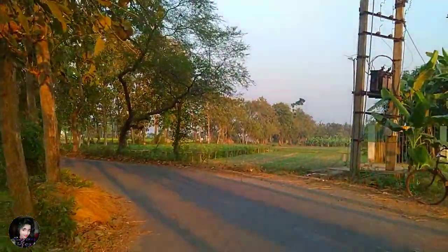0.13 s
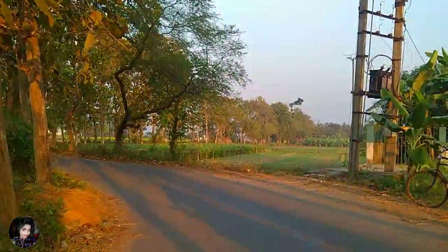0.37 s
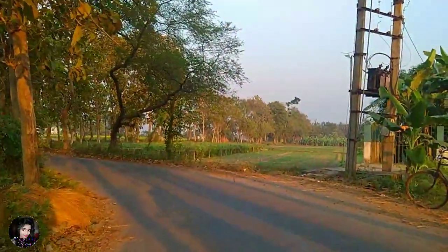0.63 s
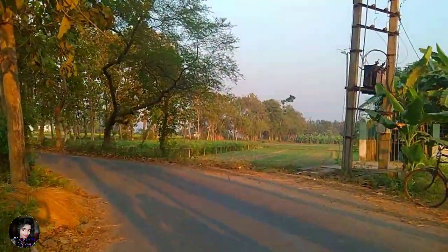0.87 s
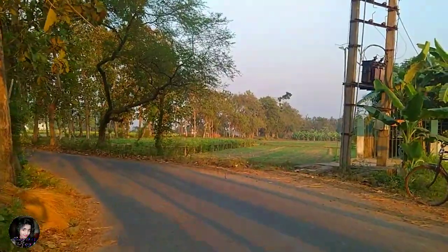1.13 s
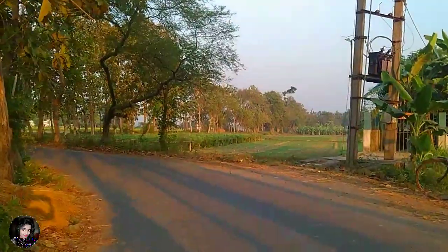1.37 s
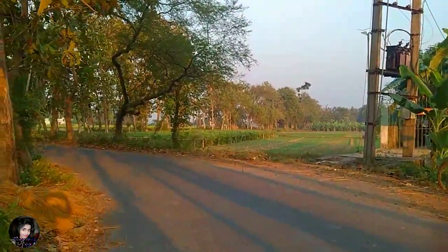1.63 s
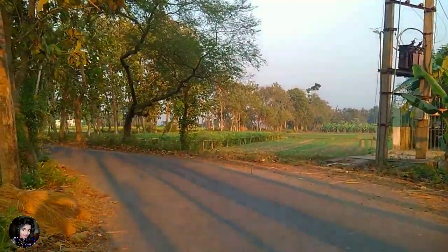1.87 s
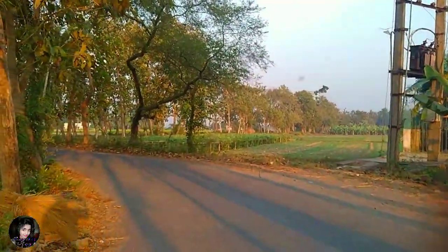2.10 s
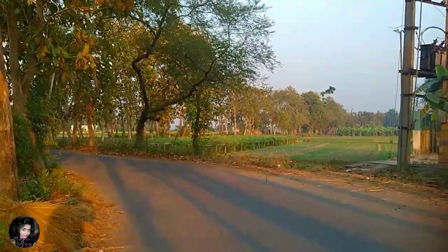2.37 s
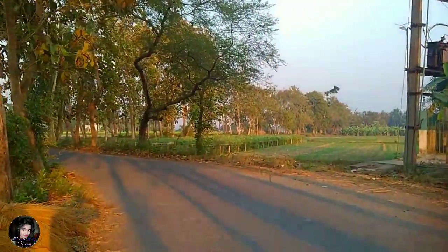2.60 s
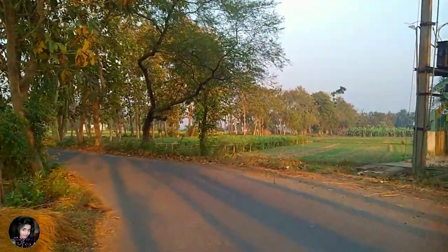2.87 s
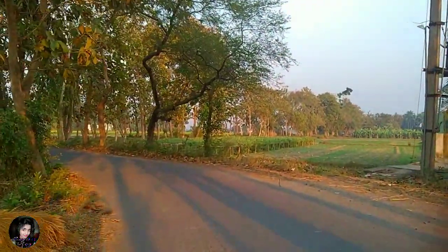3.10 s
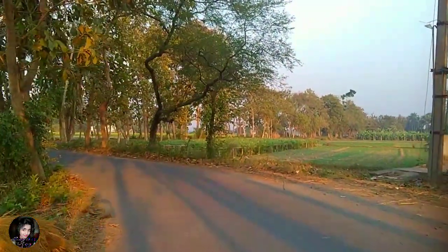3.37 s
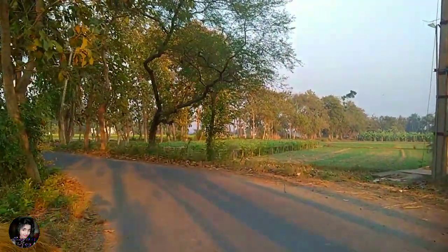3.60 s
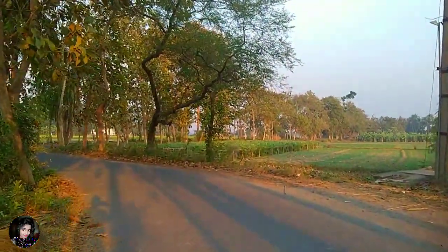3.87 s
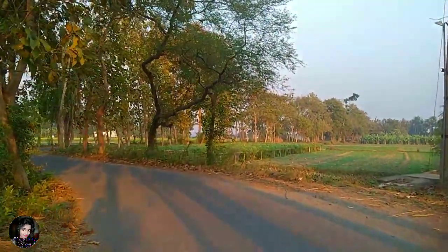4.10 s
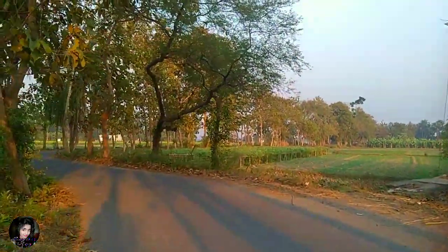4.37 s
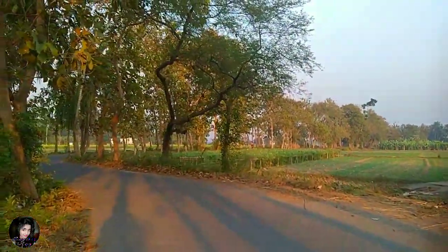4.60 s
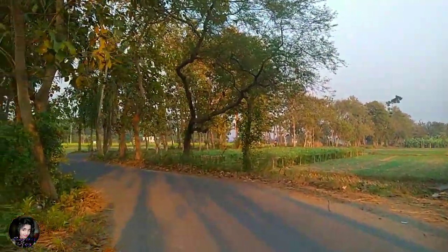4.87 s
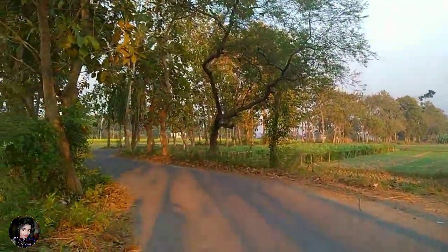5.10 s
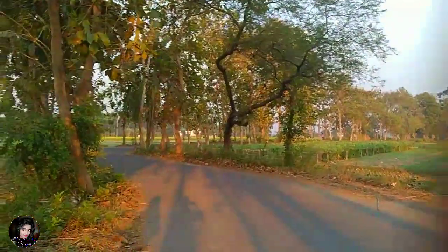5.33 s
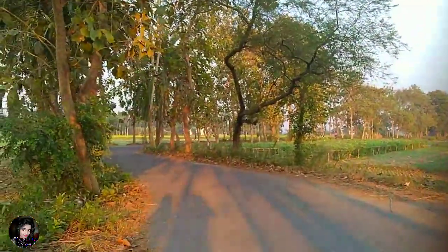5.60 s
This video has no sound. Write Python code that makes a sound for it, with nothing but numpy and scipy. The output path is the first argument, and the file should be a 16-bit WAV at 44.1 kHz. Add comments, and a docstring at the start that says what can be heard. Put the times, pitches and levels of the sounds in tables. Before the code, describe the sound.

On a tree-lined rural road, a small engine beats fast and deep, each thump hollow and slightly echoed, with gassy roar and metallic rattle pulsing along. A quick swish opens the scene, then crisp clicks and knocks scatter close to the phone. From about two seconds the engine draws away, leaving faint thuds, soft air, barely audible far chirrs, and one hard little clack near the end.

```python
"""Single-cylinder engine on a country road

A single-cylinder engine chugs away, heard through a phone: each firing rings the silencer, returns inverted
from the pipe end and comes back from trees; gas roars and parts rattle in time with it, and small parts of the
engine knock (damped resonances). Near the start a swish of shaped noise goes by; clicks (noise bursts) come
from the engine and, after about 3.4 s, from nearby, where a bouncing clack (damped resonances) also sounds, and
faint chirrs (narrow noise) sound far off, over the hush of open fields."""
import sys
import numpy as np
from scipy import signal
from scipy.fft import rfft, irfft
from scipy.io import wavfile
from scipy.ndimage import uniform_filter1d

SR = 44100
rng = np.random.default_rng(int(sys.argv[2]) if len(sys.argv) > 2 else 0)


def decibels_to_gain(level_db):
    """Convert a level in decibels to a linear amplitude gain (20 dB per decade)."""
    exponent = np.asarray(level_db, float) / 20
    return 10 ** exponent


def store_wav(level_fs):
    """Save 16-bit WAV to argv[1]."""
    pcm = np.round(np.clip(np.atleast_2d(level_fs), -1, 1) * 32767)
    wavfile.write(sys.argv[1], SR, pcm.T.astype(np.int16))


N = 252252
T = np.arange(N) / SR

# firings of the engine, levels relative to one another: start_s, level_db
FIRINGS = [(0.0475, -21.2), (0.1578, -17.6), (0.253, -14.5), (0.3463, -17.2), (0.4553, -18.7),
           (0.5603, -17.0), (0.6598, -13.1), (0.7645, -16.3), (0.8717, -13.4), (0.9769, -14.3),
           (1.0875, -15.7), (1.1932, -16.0), (1.3028, -13.0), (1.4089, -15.0), (1.5193, -15.0),
           (1.6244, -14.4), (1.7314, -17.7), (1.8384, -19.3), (1.9467, -20.7), (2.0502, -21.9),
           (2.1559, -23.2), (2.261, -23.2), (2.3639, -23.7), (2.4676, -25.2), (2.5686, -25.1),
           (2.6734, -26.6), (2.7758, -26.4), (2.8834, -28.0), (2.9905, -28.5), (3.0968, -27.9),
           (3.2009, -28.5), (3.3053, -31.3), (3.4125, -30.8), (3.5198, -26.5), (3.6201, -27.1),
           (3.7209, -29.3), (3.8268, -28.6), (3.9257, -29.1), (4.0287, -28.2), (4.129, -28.2),
           (4.2322, -29.2), (4.336, -30.0), (4.4385, -29.8), (4.5393, -31.2), (4.6433, -28.5),
           (4.7436, -28.6), (4.8424, -30.1), (4.9438, -31.1), (5.047, -31.2), (5.1425, -31.5),
           (5.2444, -32.4), (5.3507, -32.3), (5.4478, -31.9), (5.5435, -32.4), (5.6465, -34.8)]
# engine noise as it fades, before the swell of each stroke: time_s, roar_db, rattle_db
ENGINE_NOISE = [(0, -43, -56.5), (.3, -37.5, -53.5), (.5, -41, -55), (.75, -37, -56), (1.2, -38, -56.5),
                (1.6, -43.5, -54.5), (2.4, -49.5, -65), (2.9, -55, -68.5), (3.7, -53, -66),
                (4.7, -54.5, -65), (5.2, -53.5, -65), (5.72, -57.5, -69.5)]
PUFF_MS = 2.6  # length of one puff of exhaust gas


def ring(x, hz, width_hz):
    """Resonance: a damped two-pole oscillator with gain 1 at its centre."""
    r = np.exp(-np.pi * width_hz / SR)
    return signal.lfilter([1 - r, 0, r - 1], [1, -2 * r * np.cos(2 * np.pi * hz / SR), r * r], x)


def colour(x, table):
    """Spectral shaping: causal minimum-phase filter of an (hz, gain_db) table, by folding the cepstrum."""
    hz, db = np.transpose(table)
    grid = np.maximum(np.fft.rfftfreq(4096, 1 / SR), 1)
    log_gain = np.log(decibels_to_gain(np.interp(np.log(grid), np.log(hz), db)))
    cepstrum = irfft(log_gain)
    cepstrum[1:2048] *= 2
    cepstrum[2049:] = 0
    response = irfft(np.exp(rfft(cepstrum)))
    return signal.fftconvolve(x, response)[:len(x)]


def unit(x):
    """Normalisation of signal power: scaled to rms 1."""
    return x / np.sqrt(np.mean(x ** 2))


def noise():
    """White noise: independent normal samples, equal power at all frequencies."""
    return rng.standard_normal(N)


def walk(rate):
    """Random modulation: levels held 1 / rate s, smoothed twice by a moving mean; rms 1."""
    k = int(SR / rate)
    steps = np.repeat(rng.standard_normal(N // k + 1), k)
    smooth = uniform_filter1d(uniform_filter1d(steps, k), k)
    return unit(smooth[:N])


def curve(table, column, at=T):
    """Linear interpolation of one table column over time."""
    rows = np.array(table)
    return np.interp(at, rows[:, 0], rows[:, column])


def add(out, s, sound):
    """Superposition: mixes a sound in at time s."""
    i = int(s * SR)
    out[i:i + len(sound)] += sound[:N - i]


def gas_puff():
    """Pressure pulse: one smooth rise and fall of exhaust gas."""
    return np.hanning(int(PUFF_MS * SR / 1000) + 1)


def exhaust():
    """Reflection and resonance: a puff and its inverted returns drive the pipe, two chambers and tree echoes."""
    # the ring drifts along the road: time_s, first_return_share, second_return_share, small_chamber_hz
    ring_drift = [(0, 1.06, .45, 155), (.6, .95, .34, 147), (1.7, .8, .19, 145), (2.4, .78, .17, 151),
                  (2.9, .87, .36, 148), (3.35, .96, .4, 140), (4.05, .82, .05, 150), (4.4, .85, .14, 151),
                  (4.65, .84, .34, 144), (5.1, .9, .21, 147), (5.72, .95, .38, 144)]
    # large and small silencer chamber: width_hz, signed_gain
    chambers = [(7.8, 11.08), (30, -7.3)]
    large_hz, pipe_hz, pipe_width_hz = 99.8, 64.2, 101.6
    early_ms, early_share, second_lag_ms = 13.6, .11, 6.2
    return_ms, return_scatter_ms, share_scatter, chamber_scatter_hz = 20.35, .15, .04, 1.5
    # echo from the roadside trunks, and the band they send back best
    trees_ms, trees_scatter_ms, trees_db, trees_scatter_db = 42, 5, -17, 3
    trees_hz, trees_width_hz = 150, 90
    out, puff = np.zeros(N), gas_puff()
    for (s, db), chance in zip(FIRINGS, rng.standard_normal((len(FIRINGS), 6))):
        back_ms = return_ms + return_scatter_ms * chance[0]
        first = curve(ring_drift, 1, at=s) + share_scatter * chance[1]
        second = curve(ring_drift, 2, at=s) + share_scatter * chance[2]
        small_hz = curve(ring_drift, 3, at=s) + chamber_scatter_hz * chance[5]
        late_s = (trees_ms + trees_scatter_ms * chance[3]) / 1000
        echo_gain = decibels_to_gain(trees_db + trees_scatter_db * chance[4])
        pulses = [(0, 1), (early_ms, -early_share), (back_ms, -first), (back_ms + second_lag_ms, -second)]
        drive = np.zeros(SR // 4)
        for ms, share in pulses:
            add(drive, ms / 1000, share * decibels_to_gain(db) * puff)
        pipe = ring(drive, pipe_hz, pipe_width_hz)
        for hz, (width_hz, gain) in zip((large_hz, small_hz), chambers):
            thump = gain * ring(pipe, hz, width_hz)
            add(out, s, thump)
            add(out, s + late_s, echo_gain * ring(thump, trees_hz, trees_width_hz))
    return out


def bark():
    """Impulse excitation: each puff briefly rings the tail pipe, a doubled resonance."""
    hz, width_hz, lag_ms = 250, 170, 1.7
    peak_db = -20.5  # relative to the level of the firing
    puff = np.pad(gas_puff(), (0, 1500))
    pipe = -ring(ring(puff, hz, width_hz), hz, width_hz)
    pipe = pipe / abs(pipe).max()
    out = np.zeros(N)
    for s, db in FIRINGS:
        add(out, s + lag_ms / 1000, decibels_to_gain(db + peak_db) * pipe)
    return out


def stroke(depth, lead_s, open_s):
    """Amplitude modulation: gain swells while the exhaust valve is open, more on near and hard firings."""
    # all three are scaled by depth
    swell_db = 5  # at the loudest firing
    swell_fade = .1  # dB lost per dB of fading
    swell_force = .6  # dB per dB over the neighbouring firings
    times, db = np.transpose(FIRINGS)
    usual_db = uniform_filter1d(db, size=5)
    swells_db = swell_db - swell_fade * (db.max() - usual_db) + swell_force * (db - usual_db)
    u = np.linspace(0, 1, int(open_s * SR))
    shape = np.minimum(u / 0.085, 1) * np.sqrt(1 - u ** 2)
    gain_db = np.zeros(N)
    for s, height_db in zip(times, np.maximum(swells_db, 0)):
        add(gain_db, s - lead_s, depth * height_db * shape)
    return decibels_to_gain(gain_db)


def roar():
    """Turbulence and modal response: gas rushes through the pipe; uneven jolts ring each casing panel."""
    # spectrum of the gas noise: hz, relative_db
    gas_colour = [(120, -23), (230, -2), (320, -5), (600, -8), (1100, -7), (1500, -10.5), (3200, -18.5),
                  (4200, -31), (5500, -54.5)]
    # casing panels, levels relative to the gas: hz, width_hz, level_db
    panels = [(230.6, 52, -11), (291.4, 14.5, -12.5), (420, 25, -12.5), (595, 26, -13.5), (700, 65, -13),
              (764, 29, -8.5), (822, 37, -15), (947, 27, -24), (1232, 31, -13.5), (1315, 30, -10),
              (1591, 28, -17.5), (1747, 81, -16), (2065, 48, -18.5), (2375, 270, -18)]
    gas = unit(colour(noise(), gas_colour)) * decibels_to_gain(1.65 * walk(60))
    for hz, width_hz, db in panels:
        hits = rng.random(N) < 120 / SR  # about 120 per second
        jolts = hits * noise() * decibels_to_gain(3.53 * walk(22.01))
        gas = gas + unit(ring(jolts, hz, width_hz)) * decibels_to_gain(db)
    return unit(gas) * stroke(depth=0.81, lead_s=.012, open_s=0.062) * decibels_to_gain(curve(ENGINE_NOISE, 1))


def rattle():
    """Random impacts: dense tiny knocks of uneven size in loose parts, shaken hardest on the exhaust stroke."""
    # spectrum of the rattle: hz, relative_db
    rattle_colour = [(3000, -53), (4500, 5.5), (8000, -7), (12000, 5.5), (16000, -0.5)]
    gate = stroke(depth=1.0, lead_s=0.0083, open_s=0.076)
    hits = rng.random(N) < 250 / SR  # about 250 per second
    impacts = hits * decibels_to_gain(np.minimum(3.0 * rng.exponential(1, N), 11))
    # each impact's power decays exponentially
    smear = np.sqrt(signal.lfilter([1], [1, -np.exp(-1 / (0.0063 * SR))], impacts ** 2))
    hiss = unit(colour(noise(), rattle_colour))
    return unit(hiss * (1 + 0.9 * smear)) * gate * decibels_to_gain(curve(ENGINE_NOISE, 2))


def envelope(start_s, attack_s, hold_s, release_s, db):
    """Amplitude envelope: straight rise, hold and fall."""
    corners_s = start_s + np.cumsum([0, attack_s, hold_s, release_s])
    return decibels_to_gain(db) * np.interp(T, corners_s, [0, 1, 1, 0])


def swish():
    """Enveloped broadband noise: a brush of hiss swells over two scrapes of lower-pitched noise."""
    # spectra of hiss and scrape: hz, relative_db
    hiss_colour = [(2000, -34), (3500, -5.5), (4300, -12), (5300, 3), (7000, -13), (9000, -14.5),
                   (12000, -5), (16000, -6.5)]
    scrape_colour = [(120, -40), (250, 4), (420, -2.5), (800, -8), (1500, -5), (3500, -18), (6000, -34)]
    # envelopes of hiss and scrapes: start_s, attack_s, hold_s, release_s, level_db
    hiss_shape = (.045, .13, .105, .035, -30)
    scrape_shapes = [(.04, .21, .01, .025, -36), (.288, .012, .01, .025, -32.5)]
    hiss = unit(colour(noise(), hiss_colour)) * decibels_to_gain(2.2 * walk(74.2))
    scrape = unit(colour(noise(), scrape_colour)) * decibels_to_gain(2.8 * walk(118.8))
    return hiss * envelope(*hiss_shape) + scrape * sum(envelope(*row) for row in scrape_shapes)


def clicks():
    """Transient noise bursts: quick-starting sprays of treble, the topmost air with its own strength."""
    # sharp clicks, relative levels, air relative to the click: start_s, level_db, air_db
    sharp_clicks = [(0.3551, -32, -10), (0.4526, -31, -9), (0.5866, -32.5, -12), (0.6535, -28, -9),
                    (0.6644, -31, -10), (0.7492, -31, -12), (0.7697, -33, -11), (0.801, -28, -11),
                    (0.81, -32, -12), (0.8715, -28, -17), (0.9867, -32, -18), (1.084, -29.5, -12),
                    (1.1294, -35, -11), (1.1942, -31, -12), (1.2463, -32, -16), (1.2995, -25.5, -7.5),
                    (1.3212, -25, -17), (1.3774, -29, -11), (1.395, -28.5, -16), (1.4377, -28, -11),
                    (1.5184, -34, -10), (1.6324, -30, -20), (1.8233, -37, -12), (1.9325, -42, -15),
                    (2.788, -39, -14), (3.4421, -39, -21), (3.4645, -38, -18), (3.49, -41, -23),
                    (3.5034, -40, -19), (3.5548, -36, -21), (3.8432, -42.5, -19), (4.0243, -40, -15),
                    (4.0468, -39.5, -16), (4.0901, -41, -19), (4.635, -29, -20), (4.6553, -32, -18),
                    (4.6643, -33, -18), (5.212, -27, -23), (5.221, -27.5, -26), (5.2882, -38, -17),
                    (5.4994, -48, -4), (5.6321, -42, -20)]
    # spectra of the click and its topmost air: hz, relative_db
    body_colour = [(1500, -35), (3000, 3), (4500, -1), (7000, 1.5), (9500, -1.5), (12000, -5)]
    air_colour = [(8000, -14), (11000, -5), (16000, -3.5)]
    base_ms, ms_per_db, knee_db = 12.5, 2.37, -27  # clicks above the knee last longer
    # lesser clicks fall at random and follow the level of the rattle
    stray_per_s, over_rattle_db, scatter_db, stray_air_db = 19, 11.5, 6, -17
    stray_at = np.flatnonzero(rng.random(N) < stray_per_s / SR)
    stray_db = curve(ENGINE_NOISE, 2) + over_rattle_db + scatter_db * noise()
    strays = [(T[i], stray_db[i], stray_air_db) for i in stray_at]
    body, air, ms = np.zeros(N), np.zeros(N), T[:2000] * 1000
    for s, db, air_db in sharp_clicks + strays:
        length_ms = base_ms + ms_per_db * max(db - knee_db, 0)
        shape = np.minimum(ms / 0.81, 1) * np.exp(-3.1 * ms / length_ms)
        add(body, s, decibels_to_gain(db) * shape)
        add(air, s, decibels_to_gain(db + air_db) * shape)
    grit = decibels_to_gain(1.6 * walk(760))
    body = body * unit(colour(noise(), body_colour))
    air = air * unit(colour(noise(), air_colour))
    return grit * (0.17 * body + 1.56 * air)


def struck(hz, width_hz):
    """Impact excitation: a tiny gritty blow rings a damped resonance and a broader one in series; peak 1."""
    t = T[:2000]
    blow = (t == 0) + 0.18 * rng.standard_normal(len(t)) * np.exp(-t / 0.002)
    body = ring(ring(blow, hz, width_hz), hz, 3.7 * width_hz)
    return body / abs(body).max()


def knocks():
    """Free vibration after impact: small parts of the engine knock, each with its own ring."""
    # small knocks: start_s, peak_db, ring_hz, width_hz
    small_knocks = [(.271, -36, 1400, 800), (0.299, -34, 1300, 300), (0.313, -22, 420, 149),
                    (.4356, -31, 2100, 400), (0.699, -30, 2500, 1500), (.987, -30, 2200, 1200),
                    (1.137, -38, 3000, 400), (1.215, -23.5, 2420, 400), (1.632, -33, 3000, 1500),
                    (1.711, -31, 1910, 500), (1.9307, -31.5, 2070, 300), (3.3674, -50, 2460, 500),
                    (3.4894, -39, 2320, 350), (3.4928, -29.5, 2450, 800), (3.504, -29, 2270, 700),
                    (4.1024, -36, 2620, 500), (4.114, -41.5, 2900, 600), (4.131, -38, 1200, 600),
                    (4.6345, -36, 626, 200), (4.7294, -40.5, 2650, 500), (5.1952, -39, 600, 400)]
    out = np.zeros(N)
    for s, db, hz, width_hz in small_knocks:
        add(out, s, decibels_to_gain(db) * struck(hz, width_hz))
    return out


def clack():
    """Modal superposition: one harder blow close by rings several modes and bounces twice, losing energy."""
    # modes of the struck thing, relative levels: hz, width_hz, level_db
    modes = [(426, 82, -10.5), (850, 410, 1), (1500, 360, -5), (3170, 210, -6)]
    start_s, level_db, bounce_ms, bounce_loss_db = 5.2124, -26.5, 4.9, 8
    out = np.zeros(N)
    for bounce in range(3):
        s = start_s + bounce * bounce_ms / 1000
        for hz, width_hz, db in modes:
            add(out, s, decibels_to_gain(level_db + db - bounce * bounce_loss_db) * struck(hz, width_hz))
    return out


def chirrs():
    """Narrow-band noise: brief faint rasps from far off, each filtered twice by one resonance."""
    # far chirrs: start_s, length_s, hz, width_hz, level_db
    far_chirrs = [(3.66, .14, 4650, 450, -68), (4.7, .13, 6500, 600, -73), (4.76, .1, 4800, 450, -71)]
    out = np.zeros(N)
    for s, length_s, hz, width_hz, db in far_chirrs:
        hiss = rng.standard_normal(int(length_s * SR))
        rasp = unit(ring(ring(hiss, hz, width_hz), hz, width_hz))
        add(out, s, decibels_to_gain(db) * rasp * np.hanning(len(hiss)) ** 0.13)
    return out


def fields():
    """Stationary ambient noise: far leaves and air, slowly wavering, with a few faint wavering bands."""
    # spectrum of the hush: hz, relative_db
    hush_colour = [(30, -46), (45, -21), (70, -3.5), (150, 7.5), (300, -4.5), (800, -10), (1800, -17),
                   (3000, -19), (6000, -28.5), (16000, -27.5)]
    # faint bands in the hush: hz, width_hz, level_db
    bands = [(485, 40, -67), (755, 50, -65), (950, 40, -69)]
    level_db = -53.5
    hush = unit(colour(noise(), hush_colour)) * decibels_to_gain(level_db + 1.6 * walk(4.76))
    for hz, width_hz, db in bands:
        hush = hush + unit(ring(noise(), hz, width_hz)) * decibels_to_gain(db + 4.3 * walk(8))
    return hush


def scene():
    """Linear superposition of all sources at the phone."""
    engine = exhaust() + bark() + roar() + rattle()
    events = swish() + clicks() + knocks() + clack()
    return (engine + events + chirrs() + fields())[None]


def roll_off(x):
    """The treble ends steeply here."""
    return signal.sosfilt(signal.butter(12, 16450, fs=SR, output="sos"), x)


def record(dry):
    """Transducer response: the microphone port colours the treble; a steep low-pass cuts the top."""
    # response of the microphone: hz, gain_db
    mic_response = [(30, 2), (3400, -2.5), (4200, -5.5), (5300, -5.5), (7200, 2.5), (8000, 7), (8700, 12.5),
                    (9300, 3.5), (10000, -2), (12000, -12), (14000, -4.5), (15400, 2)]
    top_hz = 15520
    low_pass = signal.ellip(10, .2, 70, top_hz, fs=SR, output="sos")
    mix = signal.sosfilt(low_pass, colour(dry[0], mic_response))
    return roll_off(mix[None])


dry = scene()
out = record(dry)
store_wav(out)
```